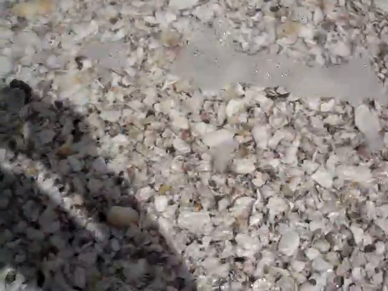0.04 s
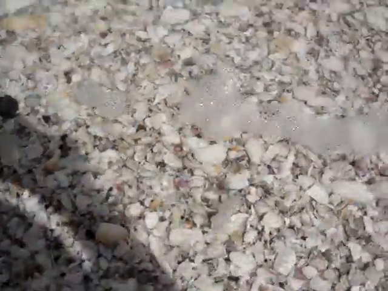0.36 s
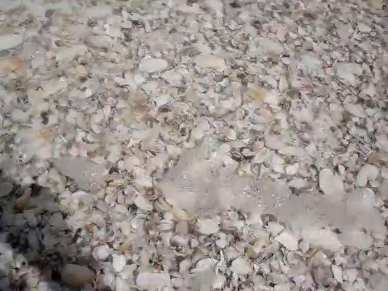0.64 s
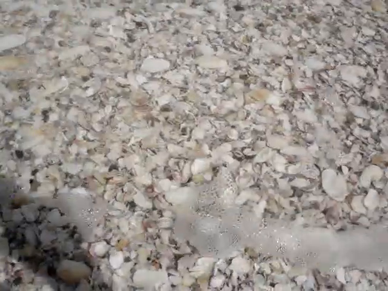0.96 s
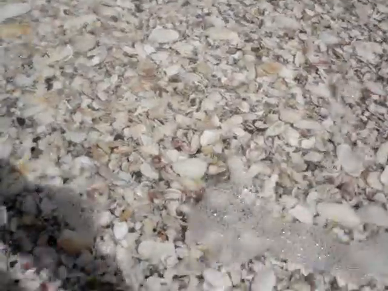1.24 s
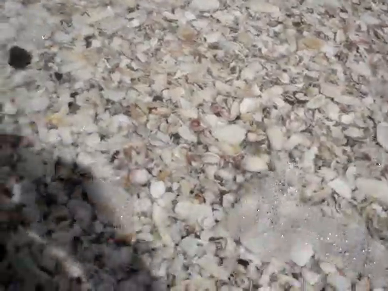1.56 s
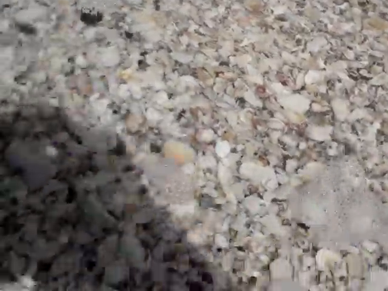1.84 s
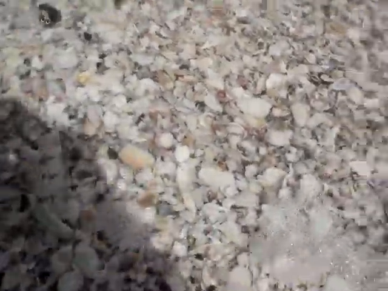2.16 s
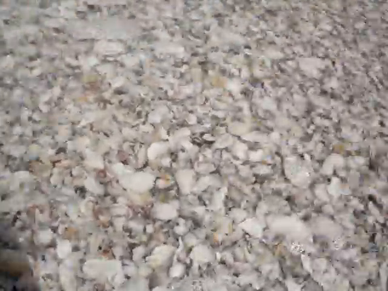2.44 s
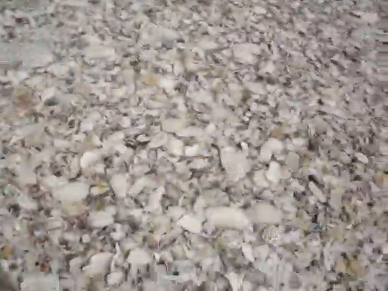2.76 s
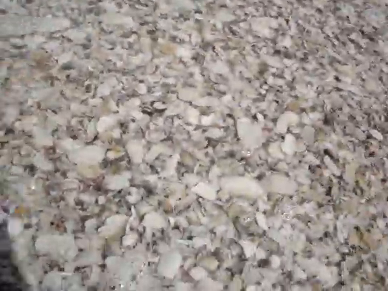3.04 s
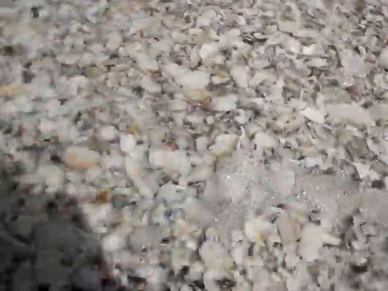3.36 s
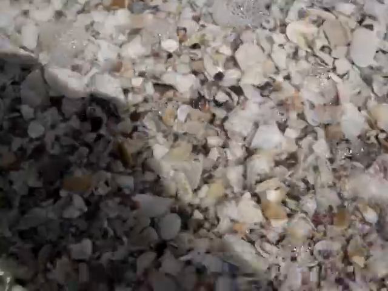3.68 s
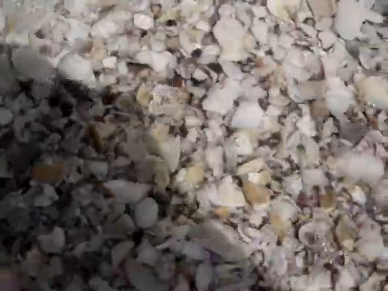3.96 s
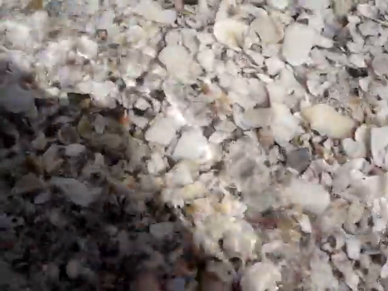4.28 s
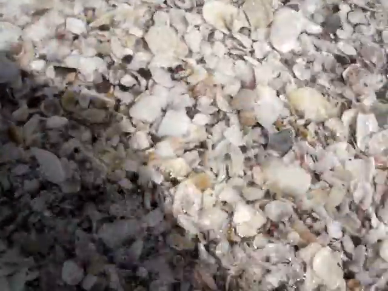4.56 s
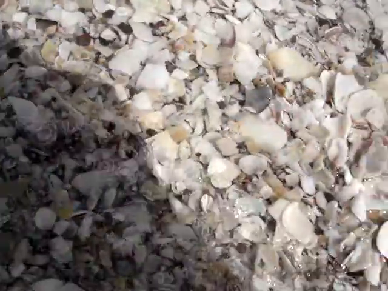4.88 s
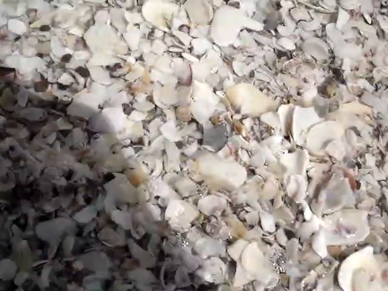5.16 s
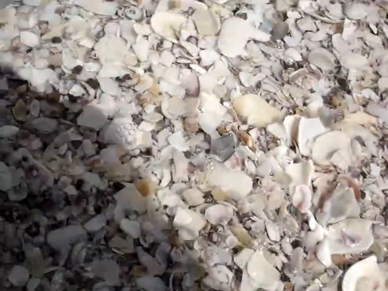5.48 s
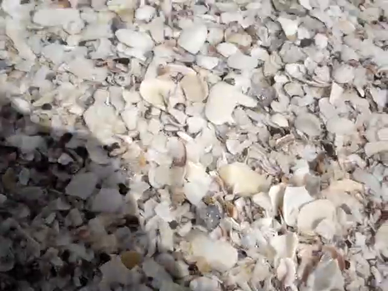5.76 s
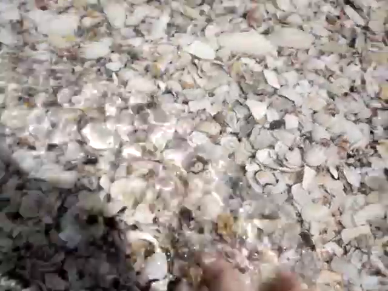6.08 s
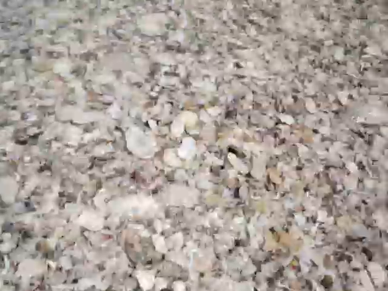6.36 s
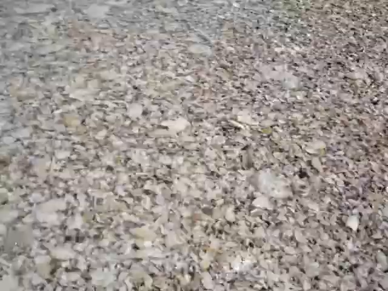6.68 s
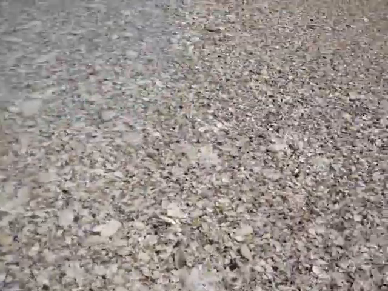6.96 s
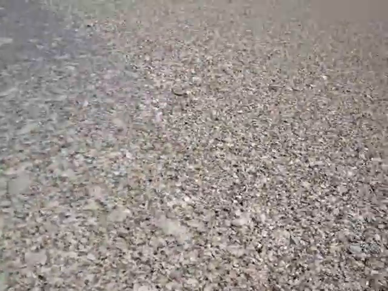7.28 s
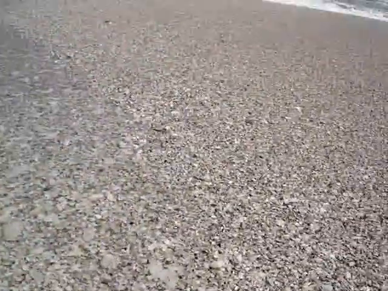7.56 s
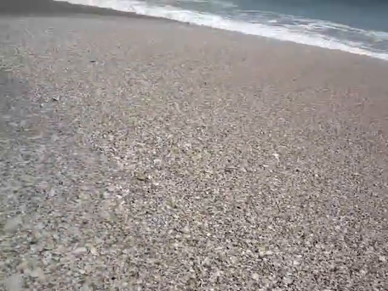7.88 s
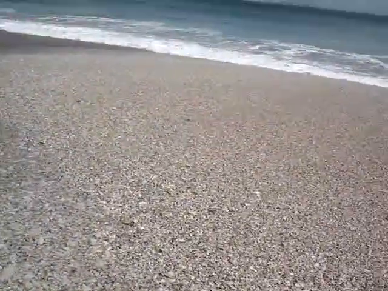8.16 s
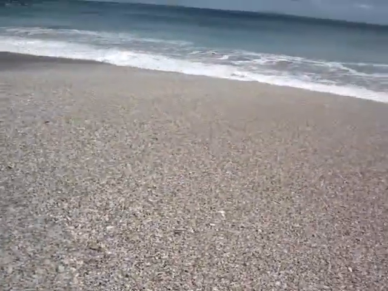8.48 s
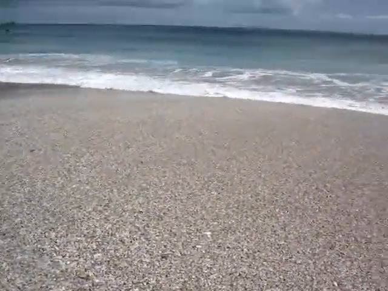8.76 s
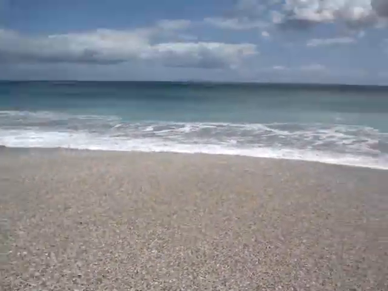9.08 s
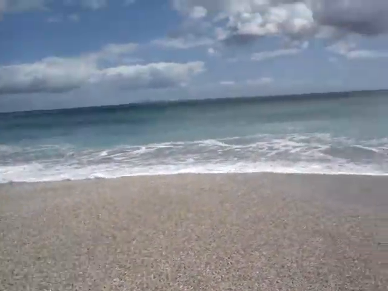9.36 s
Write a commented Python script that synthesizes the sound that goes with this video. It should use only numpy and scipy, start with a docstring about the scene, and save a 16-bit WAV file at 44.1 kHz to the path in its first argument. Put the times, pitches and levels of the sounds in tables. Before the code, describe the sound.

Wet shells crunch and rattle with small plops as wavelets wash in, followed by rumbling wind and roaring waves.

```python
"""A shell beach, shallow water, close to one small microphone. A hand dips in and rakes the shells:
wet chips collide and ring in crunching strokes, air pockets plop, small bubbles tinkle.
A wavelet washes up through the shells over the steady rush of the surf.
Then breakers roar farther out, wind buffets the microphone and one sharp click sounds."""
import sys
import numpy as np
from scipy import signal
from scipy.fft import rfft, irfft, next_fast_len
from scipy.io import wavfile
from scipy.ndimage import uniform_filter1d, map_coordinates

SR = 44100
rng = np.random.default_rng(int(sys.argv[2]) if len(sys.argv) > 2 else 0)


def to_wav(s):
    """Save 16-bit WAV."""
    ch = np.atleast_2d(s).T  # columns
    pcm = np.round(np.clip(ch, -1, 1) * 32767)  # PCM
    wavfile.write(sys.argv[1], SR, pcm.astype(np.int16))


N = 415863
T = np.arange(N) / SR


def amp(db):
    """dB to gain."""
    return 10 ** (np.asarray(db) / 20)


def unit(x):
    """Scale to rms 1."""
    return x / np.sqrt(np.mean(x ** 2) + 1e-20)


def curve(rows):
    """(t/s, value) rows to one value per sample."""
    return np.interp(T, *np.transpose(rows))


def wobble(knots_per_s):
    """Smooth random curve."""
    return map_coordinates(rng.standard_normal(int(N * knots_per_s / SR) + 4), [T * knots_per_s])


def filtered(x, response):
    """Apply a gain given as a function of f/Hz."""
    size = next_fast_len(N + SR // 2)
    return irfft(rfft(x, size) * response(np.fft.rfftfreq(size, 1 / SR)), size)[:N]


def coloured(x, spectrum):
    """Shape x by (f/Hz, level/dB) points on a log axis."""
    f, db = np.transpose(spectrum)
    return filtered(x, lambda hz: amp(np.interp(np.log(hz + 1), np.log(f), db)))


def rush(spectrum, patchy_db):
    """Coloured noise, rms 1, with random gain patches in time and frequency."""
    bins = signal.stft(rng.standard_normal(N), nperseg=512)[2]
    patches = uniform_filter1d(rng.standard_normal(bins.shape), size=5, axis=0)
    patches = unit(uniform_filter1d(patches, size=10, axis=1))
    noise = signal.istft(bins * amp(patchy_db * patches), nperseg=512)[1][:N]
    return unit(coloured(noise, spectrum))


def add(track, start_s, sound):
    """Mix a short sound into the track."""
    part = track[round(start_s * SR):][:len(sound)]
    part += sound[:len(part)]


def swell(t, life_s):
    """Soft rise to 1; decay nearly over at life_s."""
    u = 5 * t / life_s
    return u * np.exp(1 - u)


def held(rows, rise_share, release_s):
    """Rise-hold-decay events: joint gain, then the power-weighted mean of each extra column."""
    start, length, db, *columns = np.transpose(rows)[:, :, None]
    t = T[::16]
    attack = np.clip((t - start) / (rise_share * length), 0, 1)
    release = np.exp(-np.maximum(t - start - length, 0) / release_s)
    power = (amp(db) * attack * release) ** 2 + 1e-14
    total = power.sum(axis=0)
    means = [(power * column).sum(axis=0) / total for column in columns]
    return [np.interp(T, t, track) for track in [np.sqrt(total)] + means]


def grains(start, hz, life_s, strength, rise, samples):
    """Sum of short soft rings; pitch climbs by the fraction rise per life."""
    k = np.arange(samples)
    t, life_s = k / SR, life_s[:, None]
    phase = 2 * np.pi * hz[:, None] * t * (1 + rise * t / life_s / 2)
    rings = strength[:, None] * swell(t, life_s) * np.sin(phase)
    return np.bincount((start[:, None] + k).ravel(), rings.ravel(), N)[:N]


# Breaker envelope: t/s, relative level/dB
BREAKER_LEVELS = [(6.6, -34.5), (8.1, -33), (8.8, -38.5), (9.43, -39)]
# Breaker spectrum: f/Hz, level/dB
BREAKER_SPECTRUM = [(200, -3), (600, 2), (2400, 1), (4000, -4), (7000, -14), (10000, -31)]
def breakers(gain_db=3, fade_s=0.084):
    """Distant breaking waves: a smooth roar, fading outside the envelope's span."""
    outside_s = np.maximum(BREAKER_LEVELS[0][0] - T, 0) + np.maximum(T - BREAKER_LEVELS[-1][0], 0)
    envelope = amp(curve(BREAKER_LEVELS)) * np.exp(-outside_s / fade_s)
    return envelope * amp(gain_db + 0.16 * wobble(12)) * rush(BREAKER_SPECTRUM, patchy_db=1)


# Wavelets on the shore: crest t/s, relative level/dB, build/s, ebb/s
WAVELETS = [(0.05, -30.5, 0.44, .95), (1.2, -34, 0.88, 1), (2.9, -33.5, 1, 1), (4.38, -28, 0.59, 0.51),
            (5.96, -21.5, 0.53, 0.39), (6.649, -29, 0.23, 0.463)]
# Churning water spectrum: f/Hz, level/dB
SURF_SPECTRUM = [(25, -15.5), (100, -10), (190, -4.5), (400, -1), (650, -2), (1300, -5.5), (2500, -11.5),
                 (4700, -22), (10000, -46)]
def surf(gain_db=4.5, crest_shape=1.5):
    """Nearby churn: each wavelet builds to a crest (shape 1 pointed, 2 round), ebbs under the next."""
    power = np.zeros(N)
    for crest_s, db, build_s, ebb_s in WAVELETS:
        from_crest = np.abs(T - crest_s) / np.where(T < crest_s, build_s, ebb_s)
        power += (amp(db) * np.exp(-from_crest ** crest_shape)) ** 2
    return np.sqrt(power) * amp(gain_db + 0.48 * wobble(25)) * rush(SURF_SPECTRUM, patchy_db=1)


# Gusts: t/s, length/s, relative level/dB, buffeting re rumble/dB
GUSTS = [(6.625, 0.23, -18.5, 0.5), (6.94, 0.33, -16, -2.5), (7.39, 0.69, -15.5, -11),
         (8.1, 0.737, -14, -12), (8.88, 0.14, -17.5, -11.5), (9.18, .3, -20, -14.5)]
# Hardest air flaps: t/s, relative peak/dB
HARD_FLAPS = [(6.831, -6), (7.171, -12), (7.542, -10), (7.775, -8), (8.736, -9.5), (8.808, -2),
              (8.836, -14), (8.881, -7.5)]
# Eddy spectrum: f/Hz, level/dB
RUMBLE_SPECTRUM = [(25, -15.5), (45, -16), (80, -4), (220, 1), (300, -1), (450, -10.5), (1200, -34.5),
                   (3000, -70)]
# Puff and flap spectrum: f/Hz, level/dB
BUFFET_SPECTRUM = [(100, -28), (250, 2.5), (420, 7), (750, -0.5), (1400, -9.5), (6000, -53)]
def wind(rumble_db=-1, puff_db=-1, flap_db=-4, flaps_per_s=70, hard_flap_db=3):
    """Eddies rumble on the microphone port; faster air adds brighter puffs and sharp flaps."""
    rumble = amp(rumble_db + 0.66 * wobble(22)) * rush(RUMBLE_SPECTRUM, patchy_db=0.5)
    puffs = unit(amp(3.43 * wobble(130)) * rush(BUFFET_SPECTRUM, patchy_db=3))
    impulses = (rng.random(N) < flaps_per_s / SR) * rng.uniform(-1.16, 1, N)
    flaps = unit(coloured(impulses, BUFFET_SPECTRUM))
    buffeting = amp(puff_db) * puffs + amp(flap_db) * flaps
    kicks = np.zeros(N)
    for start_s, db in HARD_FLAPS:
        add(kicks, start_s, [amp(db)])
    hard_flaps = coloured(kicks, BUFFET_SPECTRUM)
    hard_flaps *= amp(hard_flap_db) * kicks.max() / hard_flaps.max()
    force, buffeting_db = held(GUSTS, rise_share=0.091, release_s=0.16)
    return hard_flaps + force * (rumble + amp(buffeting_db) * buffeting)


# Water slaps and splashes: t/s, level/dB, centre f/Hz, life/s
SLOSHES = [(2.198, -37, 50, 0.14), (2.29, -33.5, 1300, .22), (3.47, -35, 45, 0.07), (5.05, -26, 1117, 0.11),
           (5.645, -17.5, 187, .11), (5.744, -35, 2950, 0.45), (5.89, -15.5, 242, 0.058)]
def sloshes():
    """Moving water thuds and splashes: noise bursts two octaves wide."""
    out, t = np.zeros(N), np.arange(SR // 2) / SR
    for start_s, db, hz, life_s in SLOSHES:
        band = signal.butter(2, [hz / 2, hz * 2], "band", fs=SR, output="sos")
        noise = unit(signal.sosfilt(band, rng.standard_normal(len(t))))
        add(out, start_s, amp(db) * swell(t, life_s) * noise)
    return out


# Largest air pockets: t/s, relative level/dB, start f/Hz, glide time/s, slope/(oct per glide time)
BUBBLES = [(2.031, -21, 3060, 0.026, -0.2), (2.085, -15, 2760, .007, -0.1), (2.089, -9.5, 1490, 0.013, -.1),
           (2.115, -10.5, 776, .013, .15), (2.136, -17.5, 1285, 0.0334, .11),
           (2.255, -16.5, 1570, .009, 0.1), (2.289, -18.5, 1717, 0.0062, 0.3),
           (2.482, -17.5, 3920, 0.021, -.1), (2.52, -17, 3820, .02, .25), (2.545, -13.5, 1014, 0.01, .38),
           (2.568, -12.5, 1477, .017, .03), (2.611, -23, 2590, 0.026, 0.3), (2.832, -16.5, 3140, 0.0066, 0),
           (3.054, -14.5, 1430, 0.0056, -0.1), (3.084, -17, 3440, 0.0086, 0), (3.551, -16, 843, 0.016, 0.8),
           (3.566, -19, 1340, .025, 0.9), (3.655, -13, 3130, 0.018, 0.3), (3.725, -21, 2430, 0.022, 0.2),
           (3.864, -22, 2270, 0.014, 0.2), (6.176, -17.5, 4000, 0.0143, 0.1),
           (6.246, -17.5, 6940, .012, -.16), (6.269, -19, 4580, 0.009, 0), (6.321, -15, 6400, 0.0085, .03)]
def bubbles(gain_db=-1, linger=1.47):
    """Closing air pockets ring and glide, most of them upward as they near the surface."""
    out, t = np.zeros(N), np.arange(SR // 10) / SR
    for start_s, db, start_hz, glide_s, slope_oct in BUBBLES:
        hz = start_hz * 2 ** (slope_oct * np.minimum(t / glide_s, 1.5))
        # churn perturbs phase and amplitude
        bend, shake = 0.45 * unit(uniform_filter1d(rng.standard_normal((2, len(t))), size=90))
        ring = (1 + shake / 2) * np.sin(2 * np.pi * np.cumsum(hz) / SR + bend)
        add(out, start_s, amp(db + gain_db) * swell(t, glide_s * linger) ** 2 * ring)
    return out


# Single hard contacts: t/s, relative level/dB, f/Hz
CLICKS = [(1.472, -23, 4800), (2.177, -4, 4100), (2.923, -21, 2940), (3.482, -7, 4180),
          (4.131, -20.5, 3470), (5.03, -10.5, 3500), (5.509, -13.5, 6200), (6.464, -10, 5760),
          (9.079, -6, 3390), (9.0819, -8, 4180)]
def clicks(gain_db=-2, t60_s=0.01, overtone_ratio=1.9, overtone_db=-9, crack_db=-7, crack_t60_s=0.0023):
    """Hard contact: a brief crack and two quickly damped modes."""
    out, t = np.zeros(N), np.arange(SR // 20) / SR
    for start_s, db, hz in CLICKS:
        phase = 2 * np.pi * hz * t
        modes = np.sin(phase) + amp(overtone_db) * np.sin(overtone_ratio * phase)
        crack = amp(crack_db - 60 * t / crack_t60_s) * np.gradient(rng.standard_normal(len(t)))
        add(out, start_s, amp(db + gain_db) * (modes * amp(-60 * t / t60_s) + crack))
    return out


def trickle(stir, chip_hz, spread_oct, loose, gain_db=-1, max_per_s=170, cycles=26, size_db=3.5):
    """Water between the shells frees small tinkling bubbles, most where the heap is loose."""
    start = np.flatnonzero(rng.random(N) < max_per_s / SR * np.maximum(loose, 0.55))
    detune, size, ring_time = np.clip(rng.standard_normal((len(start), 3)), -2, 2).T
    hz = chip_hz[start] * 2 ** (0.65 * spread_oct[start] * detune - 0.151)  # centred just below the chips
    life_s = cycles * np.exp(ring_time / 2) / hz
    strength = stir[start] * amp(gain_db + size_db * size)
    return grains(start, hz, life_s, strength, rise=0.07, samples=1600)


# Wet chip response: f/Hz, level/dB
CHIP_SPECTRUM = [(300, -15), (1000, 1.5), (5000, 0.5), (7500, 2), (10000, -7)]
def shells(stir, chip_hz, spread_oct, loose, gain_db=-1.25, max_per_s=11000, cycles=11,
           size_db=2, clump_db=0.87, tumble_db=3.5, skew=0.14, spray_db=-14):
    """Thousands of contacts, each ringing a wet chip briefly; they clump as the heap gives way."""
    contacts_per_s = max_per_s * (stir / stir.max()) ** 0.7 * (1 - loose / 2)
    start = np.flatnonzero(rng.random(N) < contacts_per_s / SR)
    detune, ring_time, size_a, size_b = rng.standard_normal((len(start), 4)).T
    # small chips outnumber large: pitch skews upward
    octaves = spread_oct[start] * (detune + skew * detune ** 2)
    hz = np.clip(chip_hz[start] * 2 ** octaves, 500, SR / 3)
    life_s = cycles * np.exp(ring_time / 2) / hz
    size = np.minimum((size_a ** 2 + size_b ** 2) / 2, 4)
    strength = amp(size_db * size) / np.sqrt(life_s)
    heap = unit(grains(start, hz, life_s, strength, rise=0, samples=320))
    # contacts share the stirring energy
    heap /= np.sqrt(np.abs(uniform_filter1d(heap ** 2, size=1500)) + 1e-3)
    spray = amp(spray_db + 7.2 * wobble(300)) * rng.standard_normal(N)
    clumps = amp((clump_db + tumble_db * loose) * np.minimum(wobble(140), 2))
    return stir * amp(gain_db) * clumps * coloured(heap + spray, CHIP_SPECTRUM)


# Heap state: t/s, looseness (0 packed, even grind; 1 loose, separate clatters)
LOOSENESS = [(2.2, .6), (2.9, 1), (3.4, 0.36), (5.0, 0.19), (5.9, .4), (6.25, 0.99)]
# Strokes through the shells: t/s, length/s, relative level/dB, chip f/Hz, spread/oct
STROKES = [(1.33, .19, -37.5, 3870, 0.44), (2.03, .11, -28.5, 2670, 0.47), (2.155, .065, -21, 3950, 0.96),
           (2.245, .06, -24.5, 3200, 0.81), (2.37, .16, -25, 4040, 0.35), (2.8, .2, -32.5, 3408, .42),
           (3.075, .04, -27, 3740, 0.38), (3.14, .25, -31.5, 5000, .46), (3.36, .255, -21, 4940, 0.55),
           (3.68, .25, -38, 3130, .5), (4.0, .29, -31, 3470, .48), (4.29, .215, -20.5, 3480, 0.37),
           (4.52, .18, -26, 4210, .38), (4.69, .29, -20.5, 4670, 0.49), (4.99, .125, -24.5, 2940, 0.59),
           (5.48, .22, -34, 3300, 0.5), (5.72, .085, -20, 3357, 0.39), (5.83, .35, -24.5, 3130, 0.61),
           (6.2, .13, -25, 5380, .5), (6.42, .5, -40.5, 5550, 0.42)]
def raking():
    """Hand and water stir the heap: each stroke gathers force, holds, then the shells settle."""
    stir, chip_hz, spread_oct = held(STROKES, rise_share=0.25, release_s=0.06)
    loose = curve(LOOSENESS)
    return shells(stir, chip_hz, spread_oct, loose) + trickle(stir, chip_hz, spread_oct, loose)


def scene():
    """All sources at one microphone, same in both channels."""
    mono = surf() + breakers() + raking() + bubbles() + clicks() + sloshes() + wind()
    return np.array([mono, mono])


def record(dry, ceiling=0.68, top_hz=10250):
    """Soft peak limiting, then a brick-wall low-pass."""
    rounded = dry / (1 + np.abs(dry / ceiling) ** 6) ** (1 / 6)
    return np.array([filtered(channel, lambda hz: hz < top_hz) for channel in rounded])


dry = scene()
out = record(dry)
to_wav(out)
```